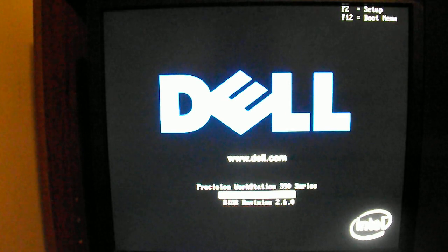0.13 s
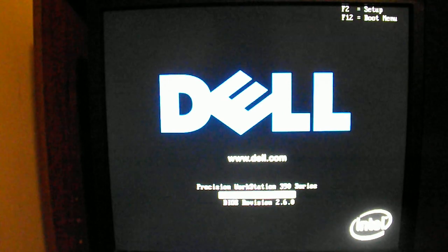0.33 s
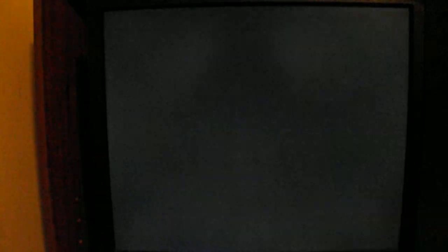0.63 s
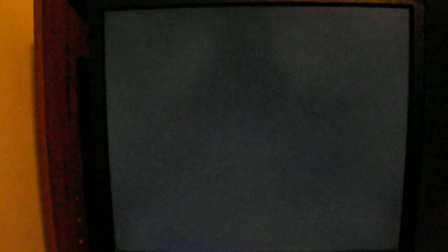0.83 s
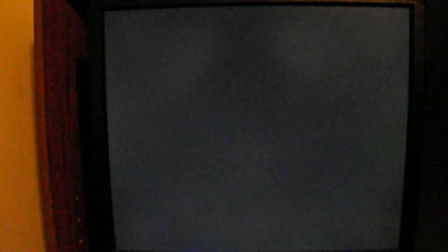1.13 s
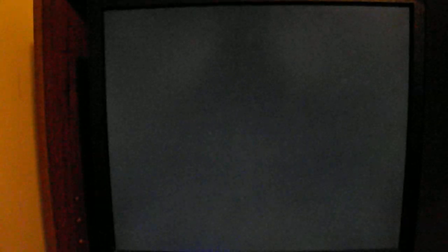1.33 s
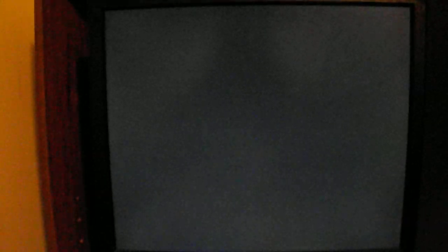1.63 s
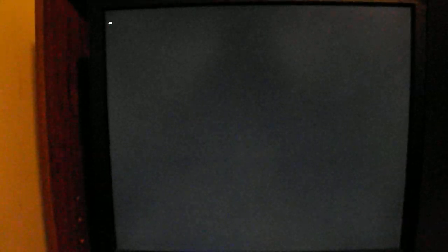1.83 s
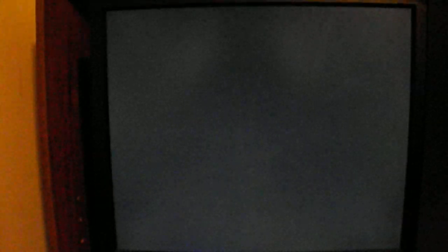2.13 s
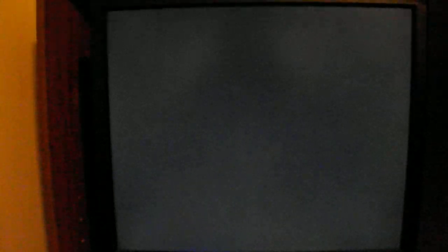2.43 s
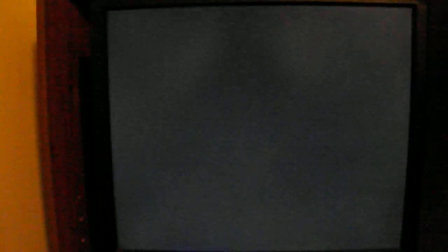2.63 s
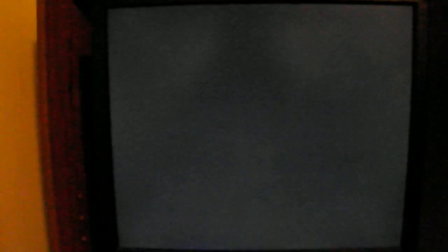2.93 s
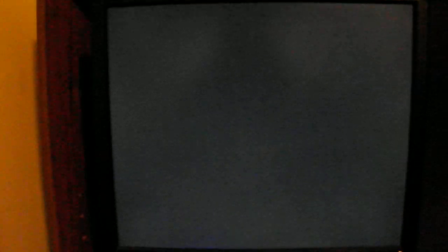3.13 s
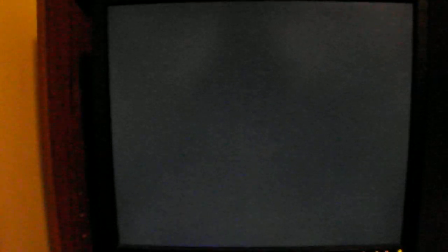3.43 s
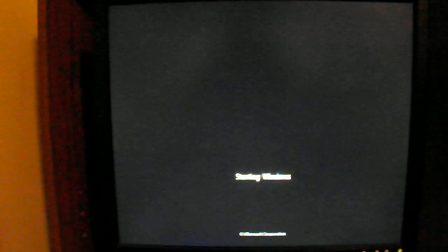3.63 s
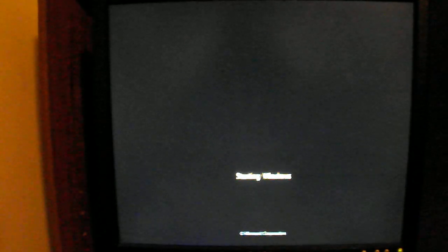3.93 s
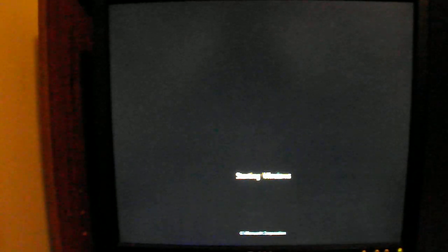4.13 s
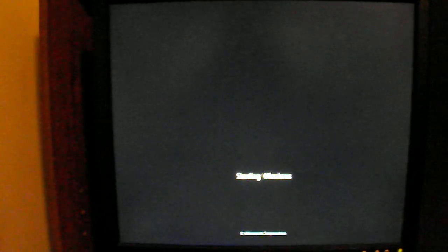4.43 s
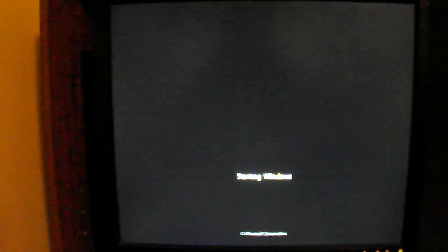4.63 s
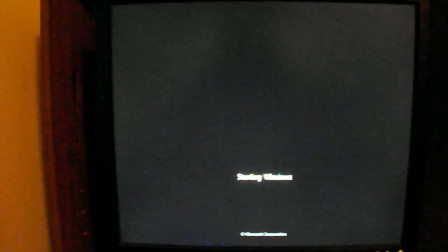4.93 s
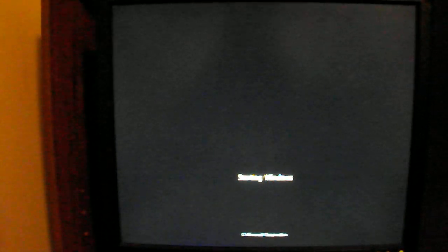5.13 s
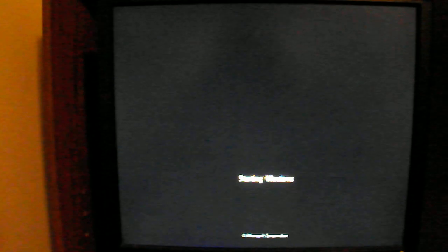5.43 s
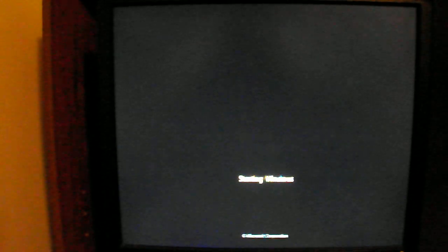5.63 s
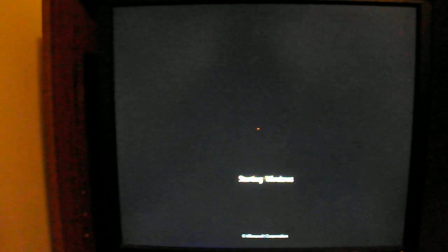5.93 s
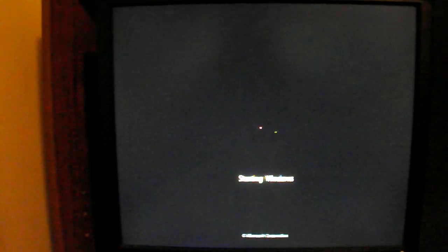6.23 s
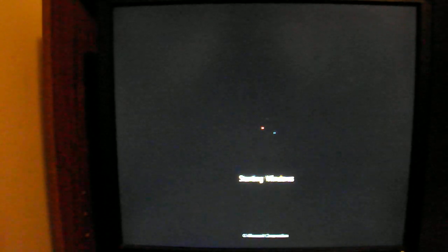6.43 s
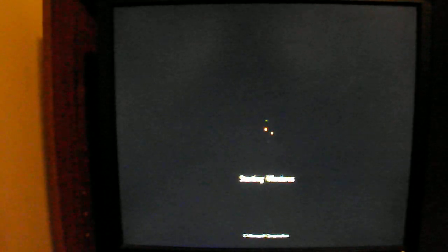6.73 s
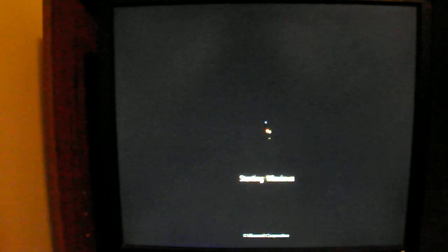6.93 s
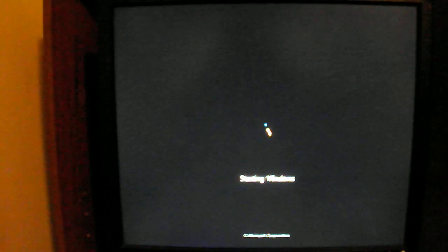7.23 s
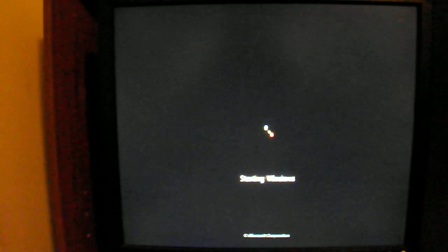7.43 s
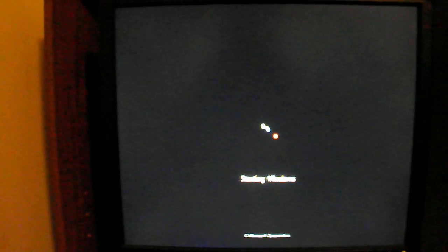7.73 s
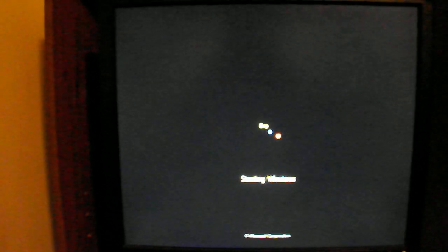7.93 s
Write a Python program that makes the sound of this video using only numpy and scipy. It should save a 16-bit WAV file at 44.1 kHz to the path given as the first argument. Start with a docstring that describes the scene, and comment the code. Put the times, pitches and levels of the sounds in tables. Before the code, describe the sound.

In a small room, a desktop computer starting up gives a constant deep fan rumble, fluttering hiss, mains hum and thin high whine. Faint dull bumps come first, then four soft knocks and a quick double tick. Later a drive hums and chatters for about a second, stops with a clack, and a light tick and faint bumps follow. A cheap, close camera microphone adds a faint thin buzz.

```python
"""Desktop computer starting up

A desktop computer starts up in a small room, close to a cheap camera.
Its fans rumble and hiss as noise shaped by resonances, over a mains hum and thin whines (wavering sines).
Bumps, knocks and ticks are struck, decaying modes; a drive hums, chatters and stops with a clack.
The camera's electronics add a faint buzz, one burst of spikes for each picture."""
import sys
import numpy as np
from scipy import signal
from scipy.fft import rfft, irfft
from scipy.io import wavfile

SR = 44100
rng = np.random.default_rng(int(sys.argv[2]) if len(sys.argv) > 2 else 0)


def digitize_waveform(pressure):
    """Quantize a signal to 16-bit integers and store it at the path in sys.argv[1].

    Rows of a 2-D input are taken as channels; values are limited to [-1, 1].
    """
    field = np.atleast_2d(pressure).T
    bounded = np.clip(field, -1, 1)
    quanta = np.round(bounded * 32767).astype(np.int16)
    wavfile.write(sys.argv[1], SR, quanta)


N = 355887
TIME = np.arange(N) / SR
FREQS = np.fft.rfftfreq(N, 1 / SR)


def amp(db):
    """Level law: decibels to amplitude gain."""
    return 10 ** (np.asarray(db) / 20)


def evened(x):
    """Normalization: scales a signal to an rms of one."""
    return x / np.sqrt(np.mean(x ** 2) + 1e-20)


def spectrum(points):
    """Spectral envelope: gain at every frequency, from points joined in dB on a log axis."""
    hz, db = np.transpose(points)
    return amp(np.interp(np.log(FREQS + 1), np.log(hz + 1), db))


def resonances(rows):
    """Power addition: bell-shaped resonances, each as wide as its half-power bandwidth."""
    power = 0
    for hz, width_hz, db in rows:
        bell = .5 ** ((2 * (FREQS - hz) / width_hz) ** 2)
        power = power + amp(db) ** 2 * bell
    return np.sqrt(power)


def noise(gain):
    """Spectral shaping: filters white noise to the given strength per root hertz."""
    white = rng.standard_normal(N)
    return irfft(rfft(white) * gain, N) * np.sqrt(SR / 2)


def drift(rate):
    """Slow random modulation: low-passed noise of rms one, up to about rate changes a second."""
    lowpass = np.exp(-(FREQS / rate) ** 2) * (FREQS > 0)
    return evened(noise(lowpass))


def add(mix, s, sound):
    """Superposition: mixes a sound in at time s."""
    part = mix[round(s * SR):][:len(sound)]
    part += sound[:len(part)]


def fans(rumble_db=.5, surge_db=0.5, surges_per_s=1.8, air_swell_db=.5, flutter_db=0.82):
    """Turbulent air: a surging rumble, a broad rush and a fluttering hiss in the case resonances."""
    # rumble before its surge and trim: pitch_hz, density_db (per Hz)
    rumble_points = [(3, -88), (10, -47), (18, -38), (23, -34.5), (30, -48.5), (44, -46.5), (55, -43.5),
                     (70, -58), (100, -63), (132, -63.5), (148, -75.5), (220, -83.5), (400, -102),
                     (900, -125)]
    # broad rush of air: pitch_hz, density_db (per Hz)
    air_points = [(60, -115), (300, -83), (450, -88), (700, -91.5), (1400, -93), (1800, -95), (3800, -91),
                  (4800, -101), (6500, -105), (11000, -105), (12500, -107), (15700, -108)]
    # resonances that colour the hiss: pitch_hz, width_hz, density_db (per Hz)
    hiss_rows = [(1028, 100, -92), (1584, 150, -90.5), (2117, 290, -87.5), (2500, 256, -85),
                 (2672, 142, -78.5), (3012, 170, -79.5), (3214, 190, -83), (3425, 174, -73.5),
                 (3605, 118, -77), (4045, 175, -88.5), (4290, 214, -87), (4534, 174, -92),
                 (5150, 590, -102), (5920, 310, -105)]
    surge = amp(rumble_db + surge_db * drift(surges_per_s))
    rumble_gain = spectrum(rumble_points)
    deep = 1 / (1 + (FREQS / 85) ** 8)  # share of the power that surges and takes the trim
    surging = noise(rumble_gain * np.sqrt(deep)) * surge
    steady = noise(rumble_gain * np.sqrt(1 - deep))
    air = noise(spectrum(air_points)) * amp(air_swell_db * drift(5.4))
    hiss = noise(resonances(hiss_rows)) * amp(flutter_db * drift(22))
    return surging + steady + air + hiss


def tones(waver_db=0.94):
    """Periodic sources: mains hum and thin whines as sines wavering a little in pitch and level."""
    # hum and whines: pitch_hz, level_db (rms, before waver), wander_hz (rms)
    tone_rows = [(120, -50, .25), (2874, -63.5, 1.8), (6016, -87.5, 1.5), (11473, -84.5, 1.0)]
    out = np.zeros(N)
    for hz, db, wander_hz in tone_rows:
        turns = np.cumsum(hz + wander_hz * drift(4.8)) / SR
        level = np.sqrt(2) * amp(db + waver_db * drift(4.6))
        out += level * np.sin(2 * np.pi * turns)
    return out


def camera_buzz(level_db=4, low_hz=4500, picture_hz=29.496):
    """Electrical leakage: thin band-limited spikes enter the microphone line with every picture."""
    # spikes within each picture: start_s (after its start), level_db (before gain and high-pass)
    spike_rows = [(.00108, -53), (.00484, -46), (.00547, -45), (.00609, -48)]
    starts = np.arange(0, TIME[-1] - 1 / picture_hz / 2, 1 / picture_hz)
    out = np.zeros(N)
    for s, db in spike_rows:
        place = (starts + s)[:, None] * SR
        near = np.round(place).astype(int) + np.arange(-16, 17)
        out[near] += amp(db + level_db) * np.sinc(near - place)  # centred between samples
    highpass = signal.butter(2, low_hz, "high", fs=SR, output="sos")
    return signal.sosfilt(highpass, out)


def hits(rows, modes):
    """Modal excitation: blows start decaying modes; soft contact builds up slowly and dulls the highest."""
    t, out = TIME[:SR // 4], np.zeros(N)
    for s, level_db, pitch, contact_s in rows:
        ring = 0
        for hz, db, t60 in modes:
            dulled = 1 / (1 + contact_s / 0.0068 * (hz / 3700) ** 6)
            decay = amp(db - 60 * t / t60)
            ring += dulled * decay * np.sin(2 * np.pi * (hz * pitch * t + rng.random()))  # random phase
        onset = 1 - np.exp(-t / contact_s)
        add(out, s, amp(level_db) * ring * onset)
    return out


def cracks(rows, level_db, t60, low_hz, high_hz, hard_s=0.00082):
    """High modal density: a blow's dense modes merge into a decaying noise burst, weaker for long contact."""
    t, out = TIME[:SR // 10], np.zeros(N)
    decay = np.exp(-np.log(1000) * t / t60)
    for s, db, _, contact_s in rows:
        add(out, s, amp(db + level_db) / (1 + contact_s / hard_s) * decay)
    band = signal.butter(8, [low_hz, high_hz], "band", fs=SR, output="sos")
    burst = signal.sosfilt(band, out * rng.standard_normal(N))
    return burst * np.sqrt(SR / 2 / (high_hz - low_hz))  # makes up for the power outside the band


def bumps():
    """Modal excitation: dull bumps of long contact ring only low modes."""
    # bumps: start_s, level_db, pitch_factor, contact_s
    bump_rows = [(.340, -57, 1.4, 0.0037), (.672, -61, 1.63, .004), (.972, -43, 0.95, 0.022),
                 (7.842, -51, 1.1, .006), (7.880, -52.5, 0.99, 0.0062)]
    # what a bump rings with: pitch_hz, level_db (relative), t60_s
    bump_modes = [(199, 5, 0.17), (255, 6.5, 0.17), (340, 2.5, 0.11), (426, -4, 0.11)]
    return hits(bump_rows, bump_modes)


def flares():
    """Amplitude modulation: short Gaussian swells of hiss in one case resonance."""
    # brief flares: start_s (time of the peak), density_db (per Hz, before the resonance), length_s
    flare_rows = [(0.487, -71.5, .021), (0.801, -72.5, .028), (1.179, -71.5, .02), (6.531, -68, 0.012),
                  (7.733, -74, 0.025)]
    # the resonance that flares: pitch_hz, width_hz, gain_db
    flare_ring = [(3350, 240, 3.5)]
    swell = sum(amp(db) * np.exp(-((TIME - s) / length) ** 2) for s, db, length in flare_rows)
    return swell * noise(resonances(flare_ring))


def knocks():
    """Modal excitation: soft knocks ring separate modes and a burst of dense ones."""
    # knocks: start_s, level_db, pitch_factor, contact_s
    knock_rows = [(1.611, -34.5, 1.02, .0013), (1.717, -38.5, .99, 0.00083), (1.807, -43, 0.98, 0.0011),
                  (1.922, -33.5, 1.02, 0.0019)]
    # what a knock rings with: pitch_hz, level_db (relative), t60_s
    knock_modes = [(293, -5, 0.072), (547, -12.5, 0.068), (1010, -21, .02), (1200, -6, 0.035),
                   (1440, -20, 0.022), (3030, 6, 0.024), (3240, 0, 0.022)]
    burst = cracks(knock_rows, level_db=1.0, t60=0.038, low_hz=251, high_hz=3440)
    return hits(knock_rows, knock_modes) + burst


def ticks():
    """Modal excitation: light ticks ring high modes and a bright burst of dense ones."""
    # ticks: start_s, level_db, pitch_factor, contact_s
    tick_rows = [(2.930, -29, 1.0, .0006), (2.941, -32, 1.0, 0.0017), (2.953, -44, 1.0, .002),
                 (6.481, -33.5, 1, 0.00018), (7.341, -36.5, 1.0, 0.000087)]
    # what a tick rings with: pitch_hz, level_db (relative), t60_s
    tick_modes = [(3200, 1.5, 0.033), (3300, 0.5, 0.034), (4270, -12, .018), (5460, -13, .022)]
    burst = cracks(tick_rows, level_db=-2.5, t60=0.016, low_hz=3400, high_hz=5670)
    return hits(tick_rows, tick_modes) + burst


def drive(steps_per_s=45, jitter=.18, step_db=-47, effort_db=1.0):
    """Rotation and impacts: a motor hums and whirrs while the head chatters in quick, uneven steps."""
    # motor tone: start_s, pitch_hz, level_db (rms)
    motor_rows = [(5.78, 175.2, -71), (5.84, 154.6, -46.5), (5.921, 125.8, -41.5), (6.08, 120.2, -59.5),
                  (6.18, 119.5, -40.5), (6.57, 120.1, -40), (6.66, 117, -54)]
    # resonances of the running drive: pitch_hz, width_hz, density_db (per Hz, before effort)
    whirr_rows = [(167, 59, -70), (258, 96, -84), (419, 45, -79.5), (750, 120, -92.5), (1500, 1400, -97)]
    # what each step of the head rings with: pitch_hz, level_db (relative), t60_s
    step_modes = [(406, -5.5, 0.1), (440, -7, 0.092), (593, -3, 0.022), (760, 1.5, 0.016), (980, -8, .012),
                  (1410, -7, 0.011), (1750, -3, .01), (2110, 2, 0.011)]
    start_s, stop_s, attack_s, release_s = 5.79, 6.68, .11, 0.075

    s, hz, db = np.transpose(motor_rows)
    turns = np.cumsum(np.interp(TIME, s, hz)) / SR
    motor_level = np.sqrt(2) * np.interp(TIME, s, amp(db), left=0, right=0)
    motor = motor_level * np.sin(2 * np.pi * turns)

    # whirr and chatter come up to full effort, hold, and let go
    rise, fall = (TIME - start_s) / attack_s, (stop_s - TIME) / release_s
    effort = amp(effort_db) * np.clip(np.minimum(rise, fall), 0, 1)
    gaps = 1 + jitter * rng.standard_normal(size=48)
    steps = start_s + np.cumsum(gaps) / steps_per_s
    chatter = hits([(at, step_db, 1, .001) for at in steps], step_modes)
    whirr = noise(resonances(whirr_rows))
    return motor + effort * (whirr + chatter)


def clack():
    """Modal excitation: the drive reaches its stop and rings its modes with a burst of dense ones."""
    # the stop: start_s, level_db, pitch_factor, contact_s
    clack_rows = [(6.662, -31.5, 0.98, 0.00089)]
    # what the clack rings with: pitch_hz, level_db (relative), t60_s
    clack_modes = [(249, -9.5, 0.057), (427, -5.5, 0.036), (525, -7, 0.032), (834, -20, 0.18),
                   (950, -14, .014), (2230, -6, 0.018), (2990, -2.5, 0.042), (3290, 3.5, 0.04)]
    burst = cracks(clack_rows, level_db=-1.0, t60=0.032, low_hz=350, high_hz=4850)
    return hits(clack_rows, clack_modes) + burst


def room(x, wet_db, t60):
    """Reverberation: convolves with sparse, decaying reflections from the desk and near walls."""
    t = TIME[:SR // 3]
    signs = rng.choice([-1., 1.], len(t))
    present = rng.random(len(t)) < 2000 / SR  # about 2000 reflections a second
    taps = signs * present * (t > .002) * np.exp(-np.log(1000) * t / t60)
    return x + amp(wet_db) * signal.fftconvolve(x, taps / np.linalg.norm(taps))[:N]


def scene():
    """Superposition: the running computer and its small mechanical sounds; only separate blows reverberate."""
    blows = room(bumps() + knocks() + ticks() + clack(), wet_db=-7, t60=0.15)
    return (fans() + tones() + flares() + drive() + blows)[None]


def record(dry, edge_hz=15720):
    """Band limiting: the camera adds its buzz and low-passes the sum, faded briefly at both ends."""
    lowpass = signal.firwin(1023, edge_hz, window=("kaiser", 9), fs=SR)
    fade = signal.windows.tukey(N, .002)
    return signal.oaconvolve(fade * (dry + camera_buzz()), lowpass[None], "same", axes=1)


dry = scene()
out = record(dry)
digitize_waveform(out)
```